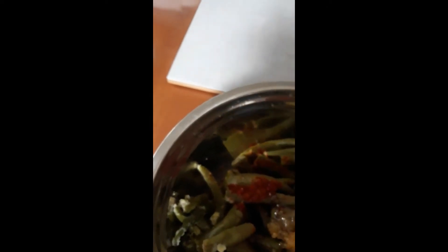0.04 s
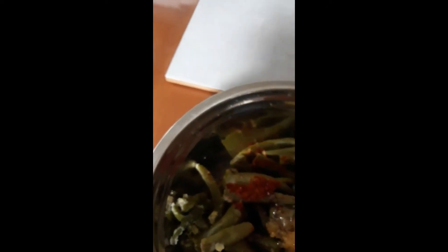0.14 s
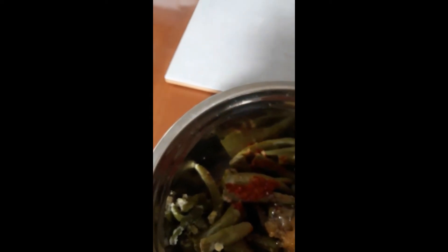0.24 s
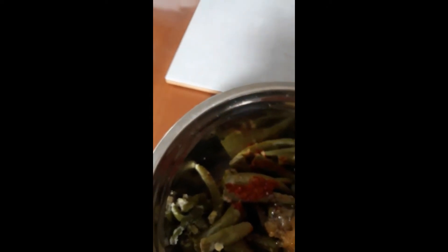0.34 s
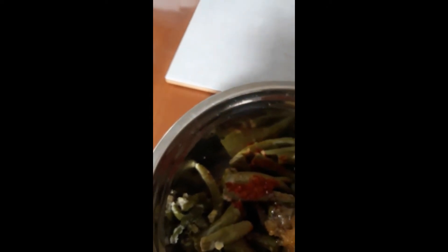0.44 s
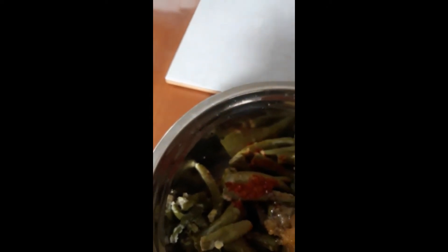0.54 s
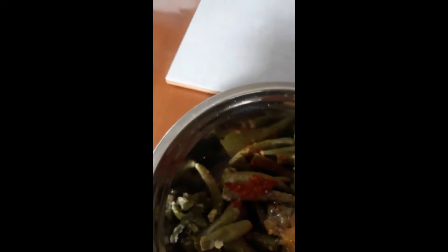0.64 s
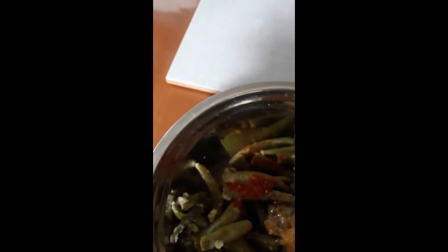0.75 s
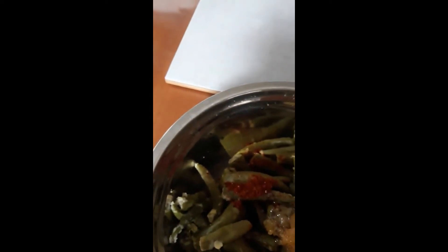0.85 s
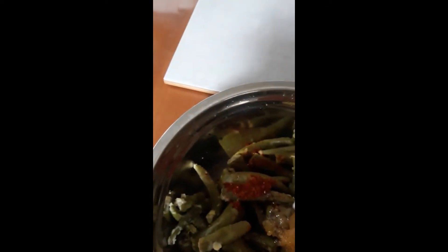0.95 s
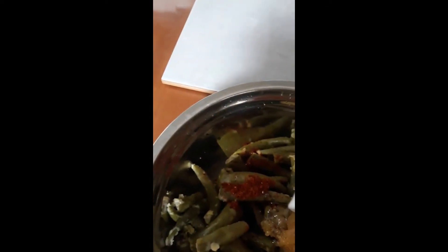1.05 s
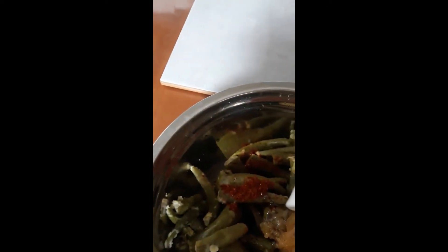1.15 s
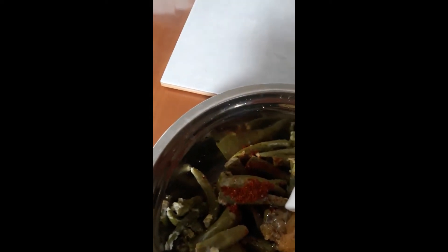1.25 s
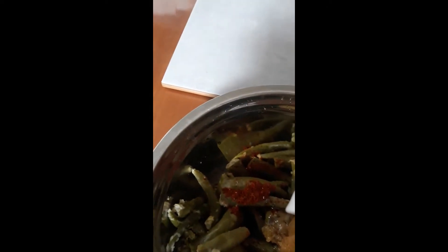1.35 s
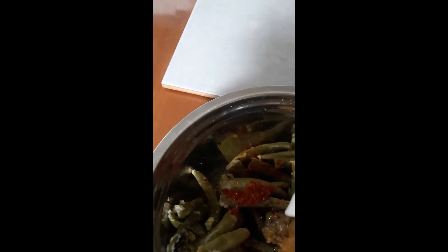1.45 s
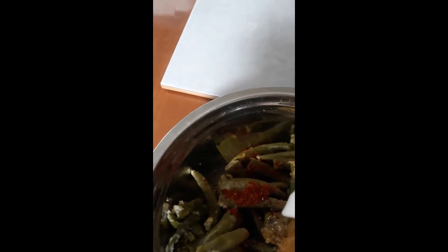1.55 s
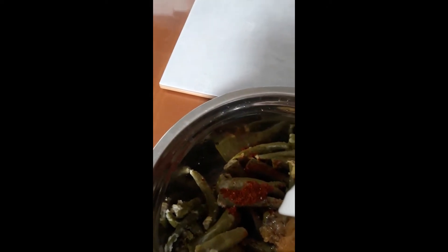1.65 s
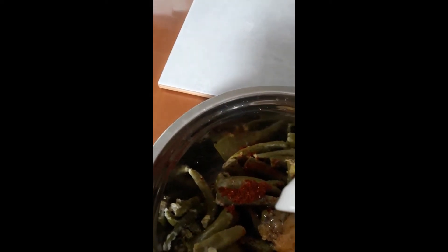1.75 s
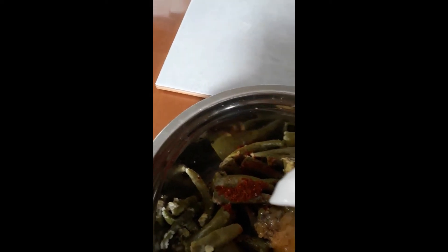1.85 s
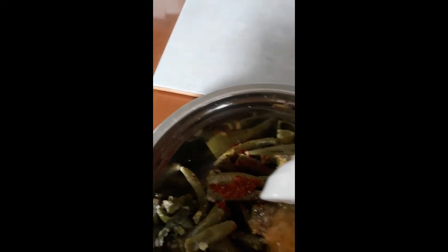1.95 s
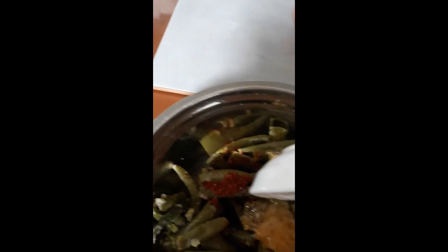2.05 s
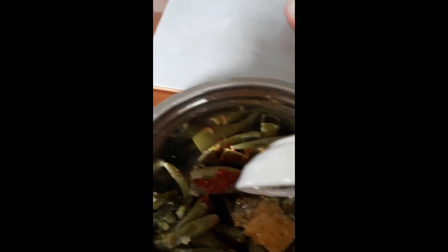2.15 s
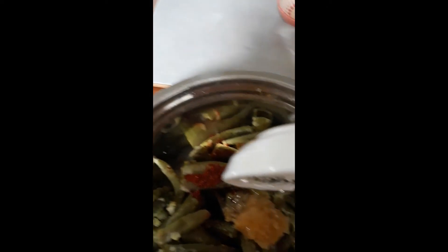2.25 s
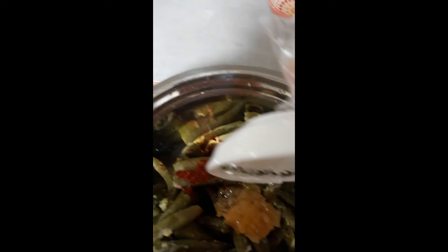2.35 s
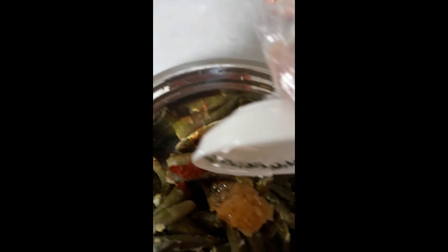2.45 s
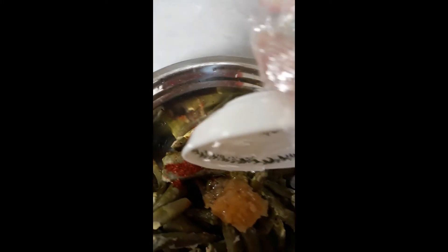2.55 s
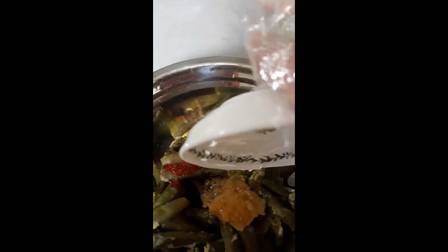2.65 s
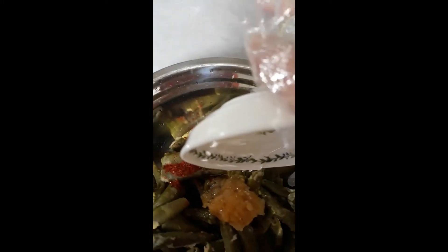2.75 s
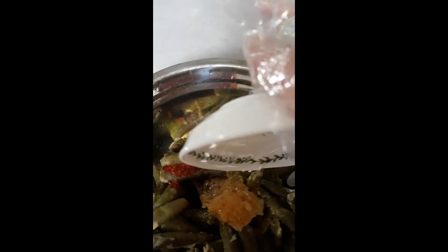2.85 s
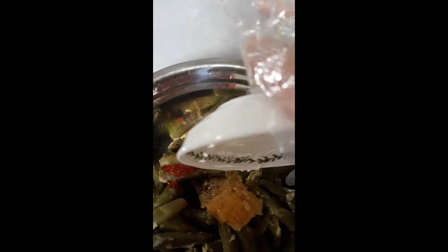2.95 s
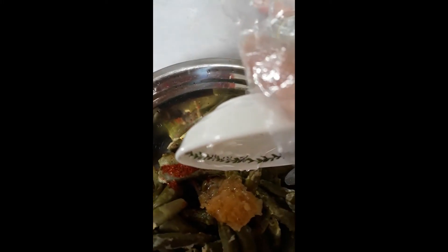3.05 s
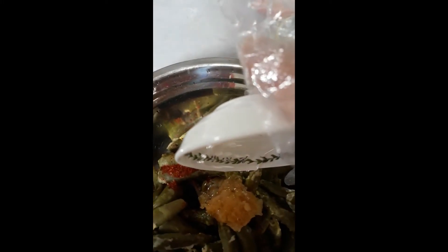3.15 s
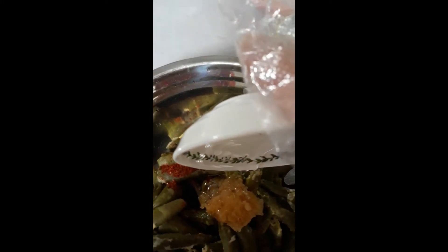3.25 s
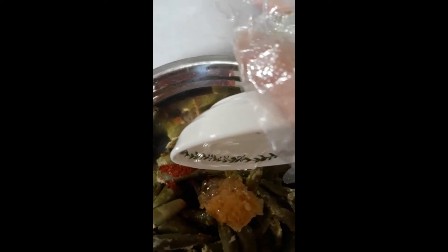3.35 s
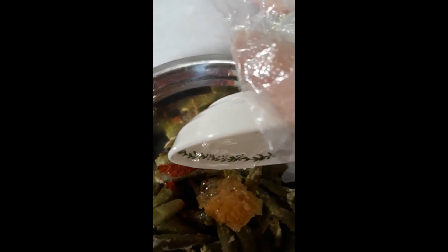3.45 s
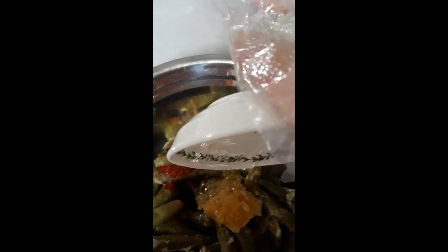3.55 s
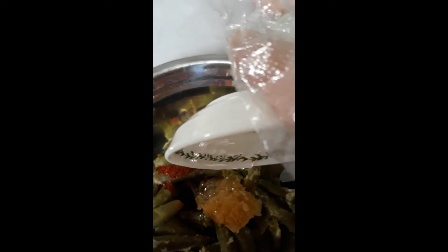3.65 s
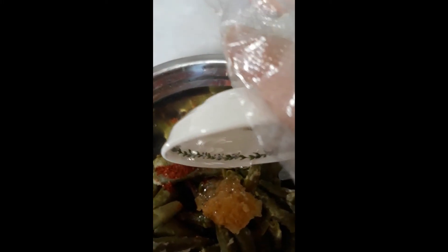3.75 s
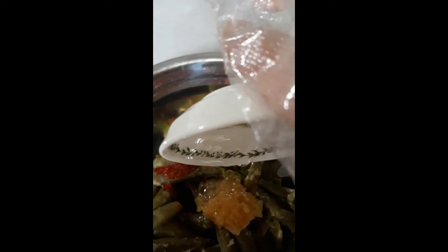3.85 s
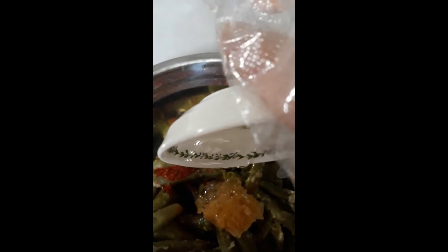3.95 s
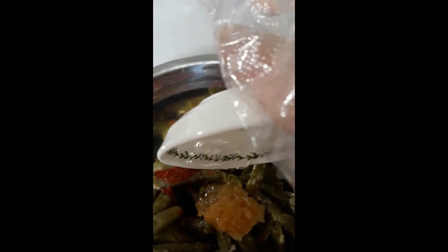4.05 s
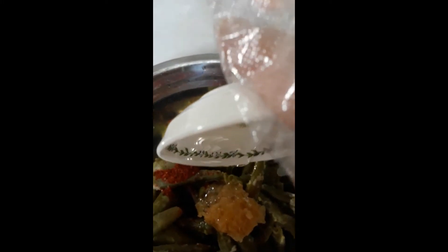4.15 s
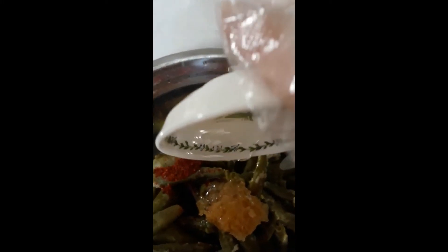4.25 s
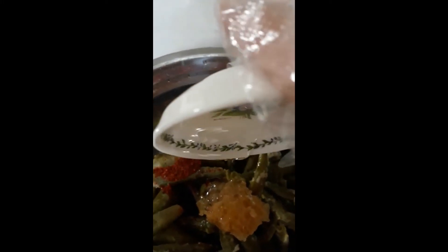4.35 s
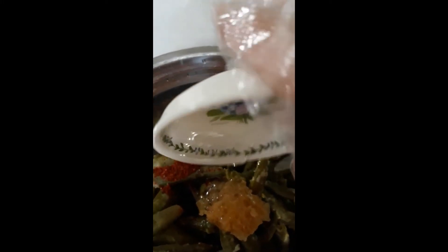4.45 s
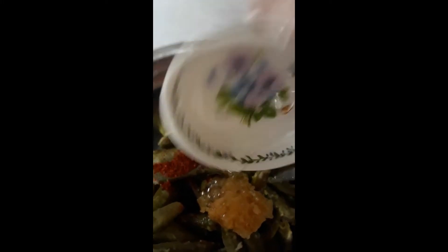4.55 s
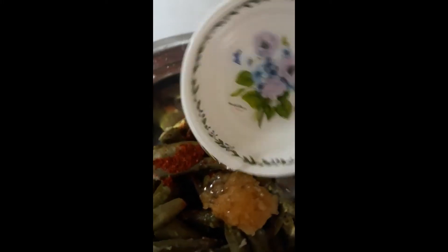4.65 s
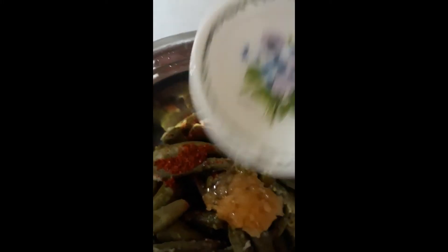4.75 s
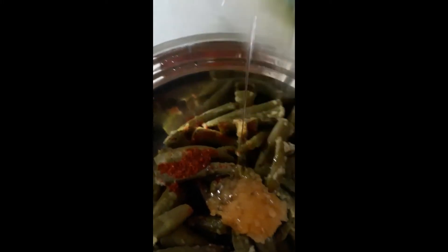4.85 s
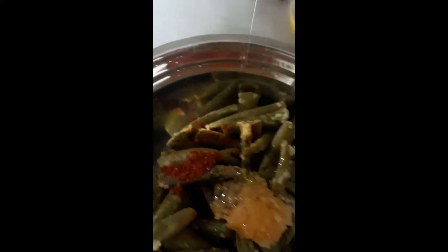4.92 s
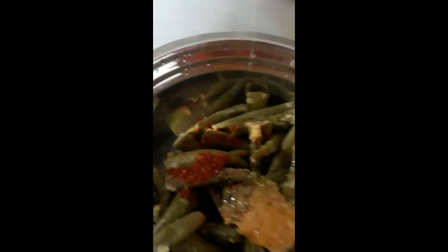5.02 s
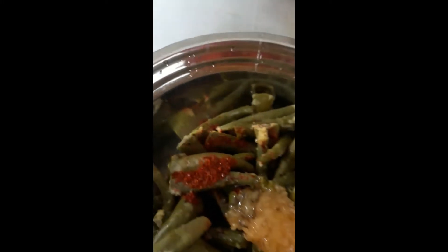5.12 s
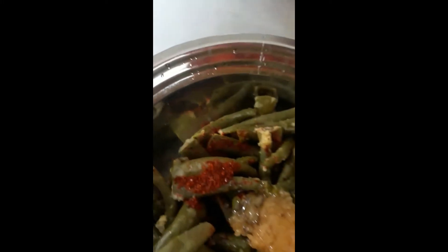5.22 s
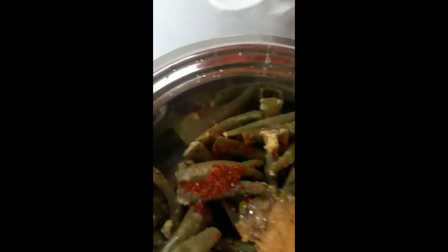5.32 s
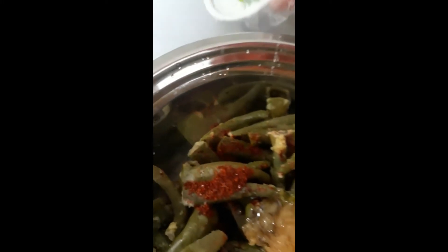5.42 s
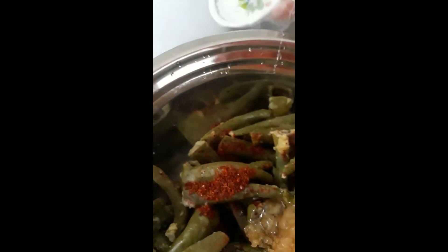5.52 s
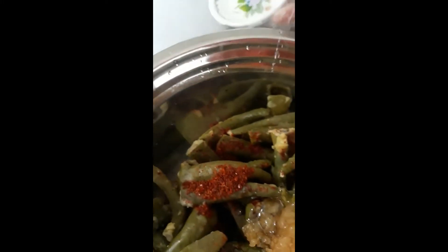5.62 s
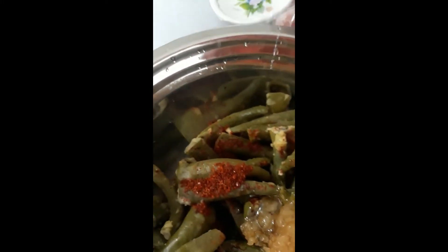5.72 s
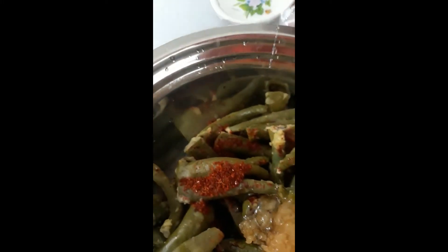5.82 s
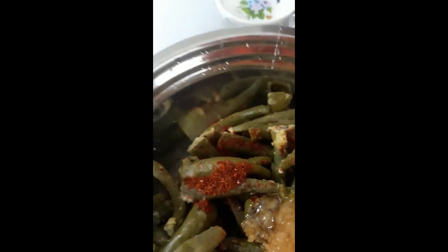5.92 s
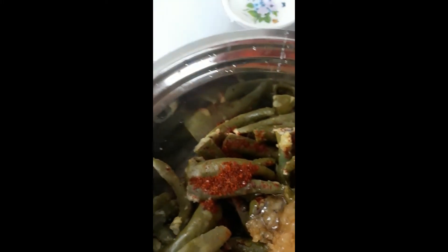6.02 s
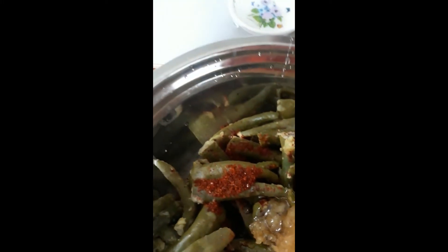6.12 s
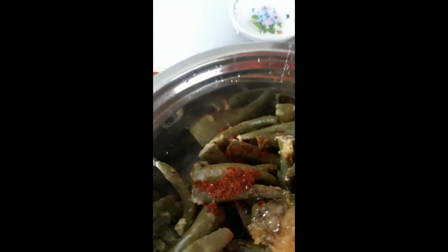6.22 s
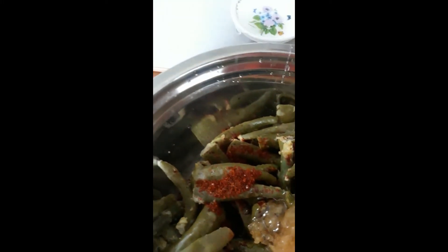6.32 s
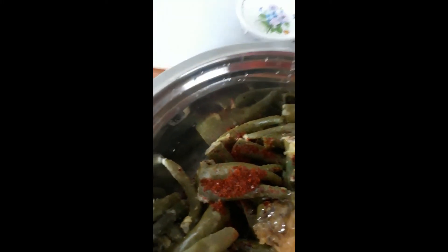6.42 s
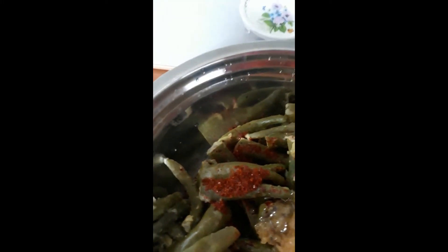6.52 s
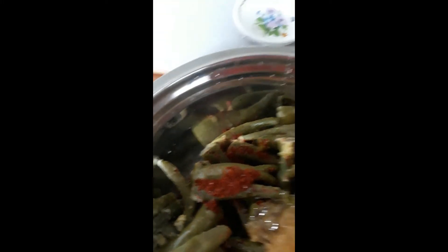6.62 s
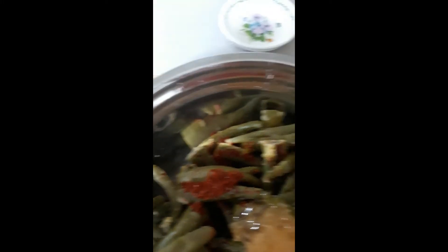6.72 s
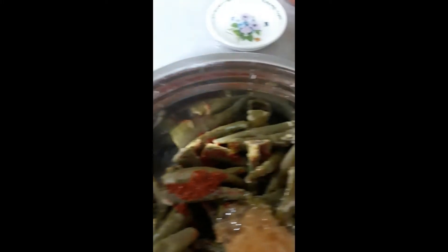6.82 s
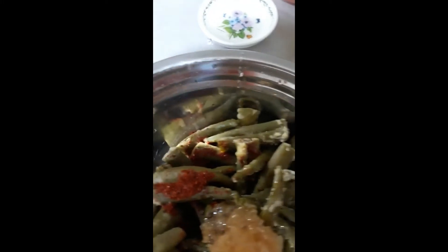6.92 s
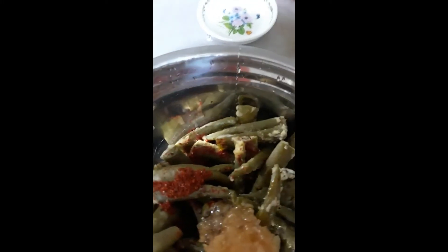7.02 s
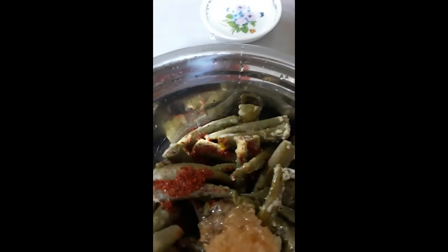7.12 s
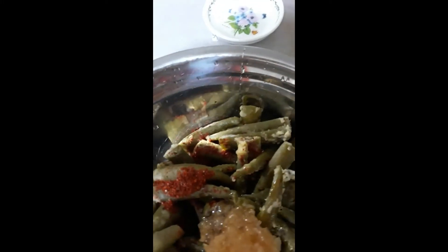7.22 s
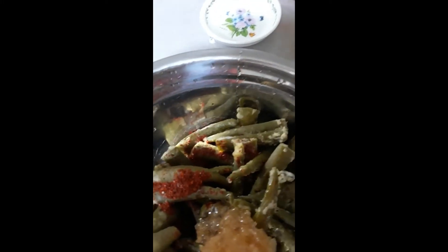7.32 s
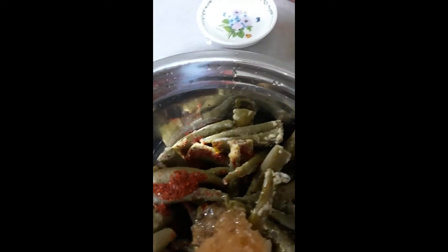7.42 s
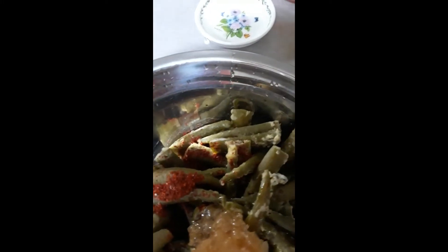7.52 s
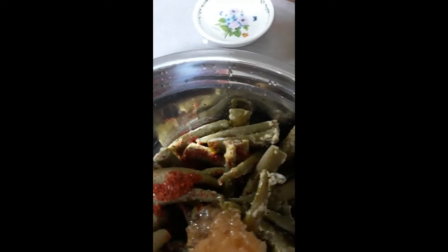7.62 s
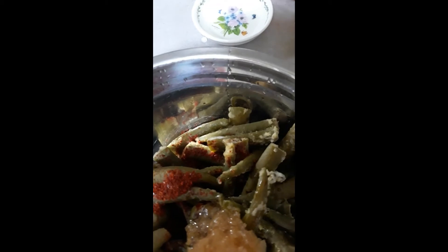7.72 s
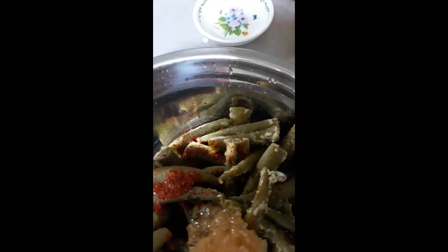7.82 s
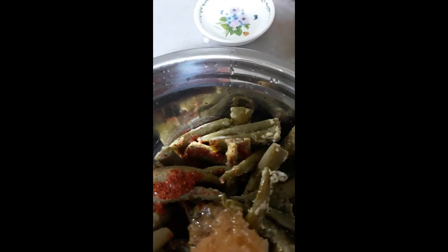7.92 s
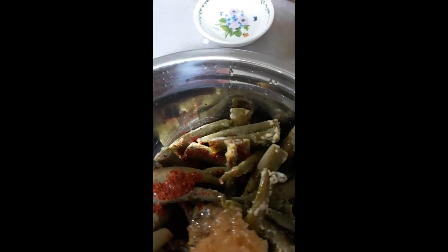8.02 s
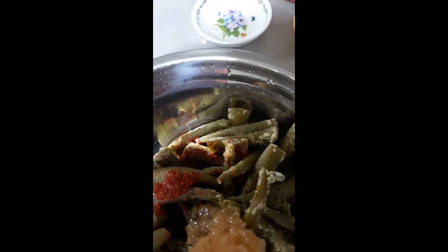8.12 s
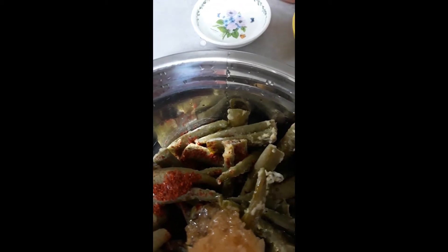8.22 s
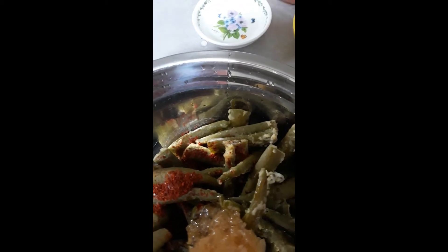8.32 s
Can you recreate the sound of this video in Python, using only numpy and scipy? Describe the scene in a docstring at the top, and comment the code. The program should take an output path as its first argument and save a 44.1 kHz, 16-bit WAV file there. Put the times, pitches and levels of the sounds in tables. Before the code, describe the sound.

A small, quiet kitchen hums with a low, slightly wavering drone and very faint even hiss. At once a thin plastic glove crackles loudly, full of crisp tiny folds and snaps, with a shorter weaker burst near 0.3 s, fading by about 0.8 s. Until 4.4 s there are only isolated dry ticks and barely audible grip rustles. From 4.5 to 5.5 s the film crinkles again in quick uneven bursts, strongest around 4.6 s. At 5.57 s a porcelain dish hits the table with a hard clack, rocking rapidly and ringing briefly; crinkling continues, and a second, brighter clink comes at 6.0 s after tiny touches. Sparse plastic ticks trail to 7.1 s. Then close rubbing on the microphone swells at 7.2 s, scratchy and hissy, with hollow throbbing strokes, bumps near 7.75 s and 8.06 s, lasting to the end at 8.4 s.

```python
"""Crackling bursts come first: a hand in a thin plastic glove tips a small porcelain dish over a steel bowl
of vegetables in a quiet kitchen. The film is many tiny ringing folds, a hiss and some large snaps.
The dish is then set down on the table with two clinks, made of noise cracks and fading porcelain tones.
Last, something rubs and bumps close to the microphone: filtered clicks with a wavering hollow tone.
Under it all, filtered noise makes a low drone with narrow hums and a faint even hiss."""
import sys
import numpy as np
from scipy import signal
from scipy.fft import rfft, irfft
from scipy.io import wavfile

SR = 44100
rng = np.random.default_rng(int(sys.argv[2]) if len(sys.argv) > 2 else 0)


def wav_out(sig):
    """Save sig, one row per channel (or a flat mono array), as 16-bit PCM at SR to the path in sys.argv[1]."""
    wavfile.write(sys.argv[1], SR, np.round(np.clip(np.atleast_2d(sig).T, -1, 1) * 32767).astype(np.int16))


N = 369116
TIME = np.arange(N) / SR

# movements of the gloved hand: start t/s, length/s, relative crinkle level/dB, brightness/dB,
# relaxing of the film/(dB per s)
HAND_MOVES = [(-.02, 0.2, -40.5, -7.5, 130), (0.273, 0.074, -46, -2, 71), (4.418, 0.1, -63, 10, 100),
              (4.499, 0.13, -41.5, 1.5, 100), (4.556, 0.069, -35.5, -3, 56), (4.952, 0.05, -50.5, -1.5, 40),
              (5.112, 0.043, -53, 3, 82), (5.3, 0.094, -58.5, 4.5, 60), (5.451, .09, -57, 0, 64),
              (5.583, .53, -47, -5, 125), (6.274, 0.36, -63.5, -2, 62), (6.885, 0.19, -66, 9.5, 61),
              (7.059, 0.035, -53.5, -1.5, 95)]
# colour of the plastic film: f/Hz, relative level/dB
FILM_COLOUR = [(100, -15.5), (350, -2), (900, -7.5), (1700, -7.5), (2250, -13.5), (2800, -1), (3800, -7),
               (4750, -1.5), (7200, -5.5), (8900, 0.5), (10900, -5.5), (14500, -4.5), (16000, -9)]
# single large folds snapping through: t/s, relative level/dB, centre f/Hz
FOLD_SNAPS = [(0.023, -23.5, 5200), (0.0473, -23, 6690), (0.055, -20, 9520), (0.074, -22, 4590),
              (0.0885, -14, 4670), (0.1383, -14, 9900), (0.2229, -29, 4890), (0.2757, -30, 4600),
              (0.3077, -22.5, 5030), (0.3478, -28, 5000), (0.3627, -32, 5000), (0.406, -25, 9050),
              (0.4432, -24, 4660), (0.5636, -31, 7650), (0.7457, -27.5, 8100), (0.759, -30, 8250),
              (1.235, -28, 8890), (2.0123, -34, 7600), (2.1959, -39, 8400), (2.2374, -23.5, 8640),
              (2.962, -33, 8700), (3.025, -39.5, 8050), (4.4637, -34, 9300), (4.5142, -29, 9100),
              (4.587, -21, 5800), (4.6047, -19, 8300), (4.7462, -17.5, 3740), (4.8766, -19.5, 8500),
              (4.914, -25.5, 3790), (5.0732, -26.5, 9500), (5.435, -31, 10400), (5.4563, -30, 8850),
              (5.5238, -27.5, 6470), (6.2382, -31.5, 8870), (6.2579, -31, 8400), (6.32, -34, 8120),
              (6.4168, -30.5, 10100), (6.471, -37.5, 3500), (6.5664, -39, 3610), (6.9342, -32.5, 9670),
              (7.0135, -37, 9220), (7.2244, -30.5, 4600), (7.5532, -32.5, 4430), (7.587, -28, 4460),
              (7.7027, -29, 5260)]
# colour of the kitchen's background noise: f/Hz, relative level/dB
ROOM_COLOUR = [(15, -52), (25, -9.5), (70, -13), (130, -4), (180, -1.5), (301, -6), (335, -4.5), (427, -8),
               (641, -17.5), (840, -25.5), (962, -26), (5000, -38.5), (8590, -43.5), (14800, -42),
               (16000, -43)]
# narrow steady hums in the drone: f/Hz, level/dB
HUMS = [(178, -65), (225, -64), (331, -68.5)]
# the lowest hum swells and fades: t/s, level/dB
LOW_HUM_LEVEL = [(0, -61), (.6, -59), (1.1, -55.5), (1.5, -68.5), (6.9, -72.5), (7.4, -64), (8.37, -58.5)]
# faint shifts of the grip: t/s, length/s, relative level/dB, centre f/Hz
GRIP_SHIFTS = [(1.083, 0.091, -64.5, 4500), (1.214, 0.047, -56.5, 2600), (1.446, 0.048, -69, 4970),
               (2.098, 0.071, -65, 3500), (3.06, 0.14, -67, 3450), (3.2, 0.1, -67, 820),
               (4.093, 0.092, -69, 4500)]
# the dish meets the table: t/s, relative level/dB, base contact cut-off f/Hz, table share/dB,
# base pitch of the rim/ratio, level change of the bounces/dB
DISH_LANDINGS = [(5.5717, 3.5, 3660, -4, 1, -4), (5.878, -32, 4000, -3, 0.93, -10.5),
                 (5.925, -19.5, 2600, 3, 1, -6), (6.004, -2, 9500, -6.5, .95, -6.5)]
# other tones of the dish and the table under it: f/Hz, relative level/dB, time to fall 60 dB/s
DISH_MODES = [(432, -17, .16), (530, -16, .13), (1128, -19, .17), (1275, -19, .18), (1336, -17, .15),
              (1768, -19, .17), (1880, -12, .14), (1991, -17, .17), (2090, -16, .19), (2195, -17, .19),
              (2372, -17, .19), (2630, -16, .17), (2985, -11, .11), (3262, -19, .15), (3855, -12, .13),
              (3973, -14, .11), (4597, -21, .15), (6350, -19, .13), (9370, -26, .11)]
# colour of the contact crack: f/Hz, relative level/dB
CRACK_COLOUR = [(60, -46.5), (500, -28.5), (1500, -14.5), (2900, -2.5), (4000, 3), (5300, -8), (6400, -3),
                (7200, -11), (9500, -6.5), (11500, -30), (16000, -28.5)]
# colour of the table's knock: f/Hz, relative level/dB
TABLE_COLOUR = [(40, -34), (130, -26.5), (280, -11), (480, -2.5), (800, -9.5), (1200, 0.5), (1550, -5),
                (2100, 3), (3600, 0), (6000, -9.5), (14000, -24)]
# rubbing strokes near the microphone: start t/s, attack/s, length with attack/s,
# relative hiss level/dB, relative hollow tone level/dB
RUB_STROKES = [(7.188, 0.17, 0.18, -40, -47.5), (7.569, 0.018, 0.046, -48, -58),
               (7.719, 0.023, .135, -45.5, -51), (7.957, 0.033, 0.086, -48, -49),
               (8.04, 0.021, 0.29, -46.5, -47)]
# colour of light rubbing, broad: f/Hz, relative level/dB
LIGHT_RUB_COLOUR = [(470, -43), (800, -1.5), (1190, -8.5), (2980, 0), (6740, 0.5), (7260, -3), (8770, -1),
                    (14300, -11.5), (16000, -7)]
# colour of pressed rubbing, narrower: f/Hz, relative level/dB
PRESSED_RUB_COLOUR = [(470, -43), (800, -18), (1550, -22), (2260, -12.5), (2600, -11), (3300, -3),
                      (4460, 1), (7170, -10), (8770, -6.5), (16000, -23)]
# bumps among the rubbing: t/s, relative level/dB
RUB_BUMPS = [(7.731, -5), (7.747, -1), (7.78, 8), (7.785, 1.5), (8.058, -4.5)]
# tones of the hollow body that is bumped: base f/Hz, relative level/dB, time to fall 60 dB/s
HOLLOW_MODES = [(176, -8, 0.064), (388, 2.5, 0.021), (647, 5, 0.094), (930, -11.5, 0.03), (1190, -18, 0.02),
                (3020, -5, 0.021), (3980, -3.5, 0.017)]

MOVE_ATTACK_S = 0.023
GRIP_DENSITY = 0.27  # factor on the share of folds that buckle while the film is held taut
TAUT_UNTIL_S = 4.35  # the glove grips the dish tightly until it is lifted away
SNAP_DB = 9  # added to every large snap
AIR_DB = -56  # level of the background noise
RIM_HZ, RIM_T60 = 2845, .15  # main bending tone of the porcelain rim, and seconds to fall 60 dB
# after each landing the dish rocks on its foot: the gaps grow,
# the bounces weaken, soften and go more into the table
ROCK_GAP_S, ROCK_GAP_GROWTH = .0082, 1.33
BOUNCE_LOSS_DB = -2.5  # per bounce
BOUNCE_SOFTENING, BOUNCE_TABLE_DB, RIM_SETTLING = .85, 1.5, 0.35  # ratio, dB, ratio, per bounce
STROKE_RELEASE_DB_PER_S = 129
THROB_PER_S, THROB_DB = 23.1, 4.5  # sticking and slipping within a stroke, dB up and down
TOUCH_S, TOUCH_RISE_S, TOUCH_DB = 7.34, 0.3, -52.5  # a light contact builds up and lasts between strokes
TOP_HZ = 16000


def undb(db):
    """Turn decibels into gain."""
    return 10 ** (np.asarray(db) / 20)


def unit(x):
    """Scale to an average strength (rms) of 1."""
    return x / np.sqrt(np.mean(x ** 2))


def curve(rows):
    """Gain over time from rows of seconds and dB, silent outside their span."""
    rows = np.array(rows)
    return undb(np.interp(TIME, rows[:, 0], rows[:, 1], left=-200, right=-200))


def add(out, s, x):
    """Mix x into out at time s."""
    i = max(int(s * SR), 0)
    out[i:i + len(x)] += x[:N - i]


def fade(t, t60):
    """Steady dying away: 60 dB down after t60 seconds."""
    return np.exp(-np.log(1000) * t / t60)


def swell(start, attack, length, release_db):
    """Attack, hold until start + length, then fall by release_db each second."""
    rise = np.clip((TIME - start) / attack, 0, 1) ** 2
    return rise * undb(-abs(release_db) * np.maximum(TIME - start - length, 0))


def colour(x, points):
    """Filter x to follow (Hz, dB) points, with no sound ahead of its cause and unit power gain."""
    hz, db = np.transpose(points)
    size = 4096
    f = np.maximum(np.arange(size // 2 + 1) * SR / size, 1)
    log_gain = np.log(undb(np.interp(np.log(f), np.log(hz), db)))
    # folding the cepstrum forward puts the filter's energy as early as possible
    cepstrum = irfft(log_gain)
    cepstrum[1:size // 2] *= 2
    cepstrum[size // 2 + 1:] = 0
    response = irfft(np.exp(rfft(cepstrum)))
    return signal.fftconvolve(x, response / np.linalg.norm(response))[:len(x)]


def cut(x, hz, kind):
    """Gentle second-order filter: "low" keeps the lows, "high" the highs."""
    return signal.sosfilt(signal.butter(2, min(hz, SR / 3), kind, fs=SR, output="sos"), x)


def resonate(x, hz, q):
    """One resonance that favours tones near hz; a higher q is narrower."""
    hz = min(hz, SR / 3)
    return signal.lfilter(*signal.iirpeak(hz, max(q, 2.5 * hz / SR), fs=SR), x)


def walk(rate):
    """Random wander of rms 1, in straight lines between rate points per second."""
    knots = rng.standard_normal(4096)
    return unit(np.interp(TIME * rate, np.arange(len(knots)), knots))


def room(x, wet_db, t60, near_db, near_t60):
    """Reflections of x: quick ones from bowl and table, then the duller kitchen tail."""
    t = TIME[:SR // 2]
    near = rng.standard_normal(len(t)) * fade(t, near_t60) * (t > .0006)
    tail = colour(rng.standard_normal(len(t)), [(300, 3.0), (4000, -0.5), (9000, -4.0), (16000, -16.5)])
    tail = tail * fade(t, t60) * (t > .006)
    response = undb(near_db) * near / np.linalg.norm(near)
    response = response + undb(wet_db) * tail / np.linalg.norm(tail)
    return signal.fftconvolve(x, response)[:N]


def crinkle():
    """Crackling folds over the hiss of sliding film; each movement swells, holds and lets the film relax."""
    moves = np.array([undb(db) * swell(s, MOVE_ATTACK_S, length, relax)
                      for s, length, db, _, relax in HAND_MOVES])
    flex = moves.max(axis=0)
    # the strongest movement at each moment sets the brightness
    bright_db = np.array([bright for _, _, _, bright, _ in HAND_MOVES])[moves.argmax(axis=0)]
    crackle = folds(flex, bright_db, spread_db=7.0, cycles=0.6, crowding=.22)
    hiss = flex * rng.standard_normal(N) * undb(4.9 * walk(110))
    return colour(undb(-1.5) * crackle + undb(-7.0) * hiss, FILM_COLOUR)


def folds(flex, bright_db, spread_db, cycles, crowding, count=16000, size=128):
    """Tiny folds buckle, each with its own pitch; a stronger movement buckles more of them."""
    when, pitch, strength, length, phase, chance = rng.random((count, 6)).T
    start = (when * (N - size)).astype(int)
    hz = 1800 * 8.5 ** pitch
    # pick which folds buckle
    slack = np.where(TIME[start] < TAUT_UNTIL_S, GRIP_DENSITY, 1)
    share = np.clip(slack * (flex[start] / flex.max()) ** crowding, .02, 1)
    # many small folds and a few large; fewer folds are each made louder
    exponential = np.minimum(-np.log(1 - strength), 3)
    gain = unit(undb(spread_db * exponential)) * (chance < share) / np.sqrt(share)
    brightness = undb(bright_db[start] * (2 * pitch - 1))
    gain = gain * flex[start] * brightness * np.sqrt(hz / hz.mean() * N / count)
    live = gain > 0
    start, hz, gain, phase = start[live], hz[live, None], gain[live, None], phase[live, None]
    # each fold swells and dies within a few cycles
    age = TIME[:size] * hz / (cycles * (.5 + length[live, None]))
    grain = age * np.exp(-age) * np.sin(2 * np.pi * (hz * TIME[:size] + phase))
    grain = gain * grain / np.linalg.norm(grain, axis=1, keepdims=True)
    return np.bincount((start[:, None] + np.arange(size)).ravel(), grain.ravel(), N)


def snaps(rise=0.00051, buckle_s=0.00083):
    """A large fold buckles, flips in about a millisecond and rings briefly, with little low tone."""
    out, t = np.zeros(N), TIME[:SR // 50]
    for s, db, hz in FOLD_SNAPS:
        burst = rng.standard_normal(len(t)) * t / rise * np.exp(-t / rise)
        ringing = resonate(resonate(burst, hz, 1.8), hz, 1.8)
        film = cut(colour(burst, FILM_COLOUR), .5 * hz, "high")
        snap = cut(ringing + undb(-6.5) * film, 0.35 * hz, "high")
        add(out, s + buckle_s, undb(db + SNAP_DB) * snap / np.linalg.norm(snap))
    return out


def kitchen():
    """A low drone with narrow wavering hums, and faint even hiss."""
    hum = sum(undb(db) * hum_at(hz) for hz, db in HUMS) + curve(LOW_HUM_LEVEL) * hum_at(127)
    return undb(AIR_DB) * unit(colour(rng.standard_normal(N), ROOM_COLOUR)) + hum


def hum_at(hz):
    """A narrow, wavering hum: noise through two sharp resonances."""
    return unit(resonate(resonate(rng.standard_normal(N), hz, 17), hz, 17))


def grip():
    """Soft brief rustles as the fingers shift on the dish: short bands of noise."""
    out = np.zeros(N)
    for s, length, db, hz in GRIP_SHIFTS:
        noise = rng.standard_normal(SR // 4)[:int(length * SR)]
        add(out, s, undb(db) * unit(resonate(noise, hz, 1.1)) * np.hanning(len(noise)))
    return out


def dish(rise=0.00087):
    """The dish's foot lands and rocks: a crack, ringing porcelain, the knock and thud of the table top."""
    clack, thud, t = np.zeros(N), np.zeros(N), TIME[:SR // 3]
    for s, db, contact_hz, table_db, _ in blows():
        crack = colour(rng.standard_normal(len(t)) * t / rise * np.exp(1 - t / rise), CRACK_COLOUR)
        shake = rng.standard_normal(len(t)) * fade(t, 0.16)
        knock = colour(shake, TABLE_COLOUR)
        # a softer contact pushes for longer and loses treble
        contact = undb(-6.0) * crack + undb(table_db - 15) * knock
        contact = cut(cut(contact, 0.95 * contact_hz, "low"), 1.9 * contact_hz, "low")
        add(clack, s, undb(db) * contact)
        add(thud, s, undb(db + table_db - 27.5) * cut(shake, 170, "low"))
    # only the rim changes pitch from blow to blow
    tone = undb(-14.5) * porcelain(DISH_MODES, pitch=0)
    tone = tone + undb(-10.5) * porcelain([(RIM_HZ, 0, RIM_T60)], pitch=0.84)
    echo = room(clack + undb(-13.0) * tone, wet_db=-13.0, t60=0.35, near_db=-2.5, near_t60=0.12)
    heard = clack + tone + echo
    return cut(heard, 280, "high") + thud  # the small dish radiates little bass, the table does


def blows(count=4):
    """Each landing and its bounces: time, level dB, base cut-off Hz, table share dB, base rim pitch ratio."""
    hits = []
    for s, db, contact_hz, table_db, pitch, rebound_db in DISH_LANDINGS:
        for k in range(count):
            delay = ROCK_GAP_S * sum(ROCK_GAP_GROWTH ** j for j in range(k))
            hits.append((s + delay,
                         db + rebound_db * (k > 0) + BOUNCE_LOSS_DB * k,
                         contact_hz * BOUNCE_SOFTENING ** k,
                         table_db + BOUNCE_TABLE_DB * k,
                         1 + (pitch - 1) * RIM_SETTLING ** k))
    return hits


def porcelain(modes, pitch):
    """Every bounce feeds energy into the modes (natural tones), which ring on and fade."""
    first = DISH_LANDINGS[0][0]
    t = TIME[:SR]
    s, _, _, _, ratios = np.transpose(blows())
    # pitch sets how far the rim ratios bend the tone: 0 is not at all
    clock = np.cumsum(np.interp(first + t, s, ratios) ** pitch) / SR
    rings, out = 0, np.zeros(N)
    for hz, mode_db, t60 in modes:
        fed = np.zeros(len(t))
        for when, db, contact_hz, table_db, _ in blows():
            # the low modes belong to the table top; a soft contact hardly reaches the high ones
            power = undb(db + mode_db + table_db * (hz < 1500)) ** 2
            fed[int((when - first) * SR)] += power / (1 + (hz / contact_hz) ** 4)
        energy = signal.lfilter([1], [1, -fade(2 / SR, t60)], fed)
        level = cut(np.sqrt(energy), 500, "low")
        rings = rings + level * np.sin(2 * np.pi * (hz * clock + rng.random()))
    add(out, first, rings)
    return out


def rubbing():
    """Dense tiny slips hiss beside the throbbing tone of a hollow body; bumps ring all its modes."""
    slips = clicks(rate=1900, spread_db=2.5) * undb(1.87 * walk(55))
    pressure = np.interp(TIME, [7.6, 8.0], [0, 1])
    light = unit(colour(slips, LIGHT_RUB_COLOUR))
    pressed = unit(colour(slips, PRESSED_RUB_COLOUR))
    hiss = (1 - pressure) * light + pressure * pressed
    # sticking and slipping keeps the body's main mode going in uneven throbs
    hz = 660 * (1 + 0.021 * walk(45))
    tone = unit(np.sin(2 * np.pi * np.cumsum(hz) / SR) * undb(4.2 * walk(40)))
    tone += undb(-3.0) * unit(resonate(resonate(rng.standard_normal(N), 650, 4.6), 635, 3.2))
    rumble = unit(resonate(resonate(rng.standard_normal(N), 205, 1.2), 210, 1.2))
    slide, throb = strokes()
    out = hiss * slide + undb(-3.5) * tone * throb + undb(-28.0) * rumble * np.sqrt(slide)
    for s, db in RUB_BUMPS:
        bump = cut(ring(HOLLOW_MODES, TIME[:SR // 4], detune=0.02), 81, "high")
        add(out, s, undb(db - 37.5) * bump)
    return out


def clicks(rate, spread_db, cap=5.1):
    """Random clicks, about rate per second: many small, a few large."""
    size = undb(spread_db * np.minimum(rng.exponential(size=N), cap))
    return unit((rng.random(N) < rate / SR) * size * rng.choice([-1, 1], N))


def strokes():
    """Strength of the hiss and of the hollow tone, which throbs as each stroke sticks and slips."""
    slide, throb = undb(TOUCH_DB) * np.clip((TIME - TOUCH_S) / TOUCH_RISE_S, 0, 1), 0
    for s, attack, length, hiss_db, tone_db in RUB_STROKES:
        push = swell(s, attack, length, STROKE_RELEASE_DB_PER_S)
        beat = np.cos(2 * np.pi * THROB_PER_S * (TIME - s - attack))
        slide = np.maximum(slide, undb(hiss_db) * push)
        throb = np.maximum(throb, undb(tone_db + THROB_DB * beat) * push)
    return slide, throb


def ring(modes, t, detune=0):
    """Sum of struck modes, slightly detuned by the contact."""
    out = 0
    for hz, db, t60 in modes:
        struck_hz = hz * (1 + detune * rng.standard_normal())
        out = out + undb(db) * fade(t, t60) * np.sin(2 * np.pi * struck_hz * t)
    return out


def scene():
    """Glove, dish and rubbing in the kitchen."""
    rustle, ticks = crinkle() + grip(), snaps()
    # the snapping folds face the microphone and send less into the room
    echo = room(rustle + undb(-1.5) * ticks, wet_db=-12, t60=0.24, near_db=-9.5, near_t60=0.046)
    return (rustle + ticks + echo + kitchen() + dish() + rubbing())[None]


def record(dry):
    """The recorder clips at full scale, then steeply cuts everything above TOP_HZ."""
    clipped = np.clip(dry, -1, 1)
    return signal.sosfilt(signal.ellip(10, .2, 70, TOP_HZ, fs=SR, output="sos"), clipped)


dry = scene()
out = record(dry)
wav_out(out)
```